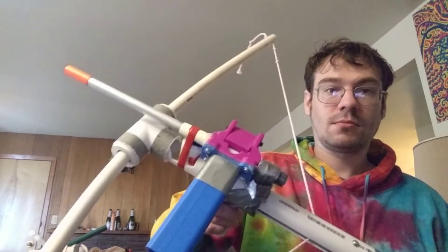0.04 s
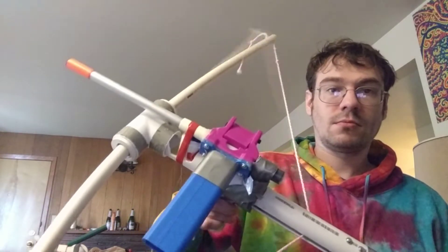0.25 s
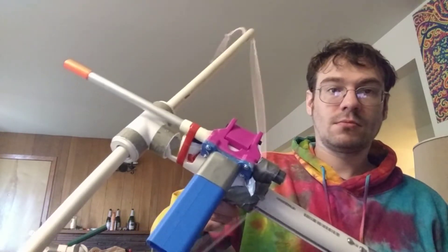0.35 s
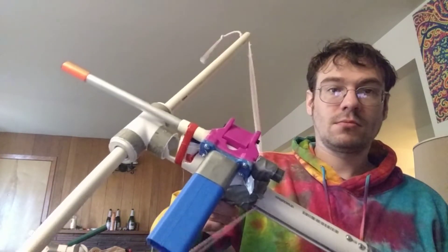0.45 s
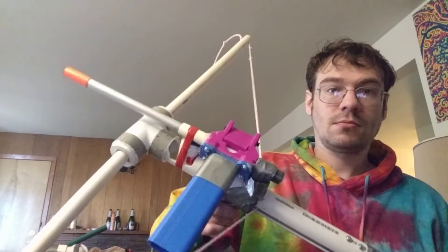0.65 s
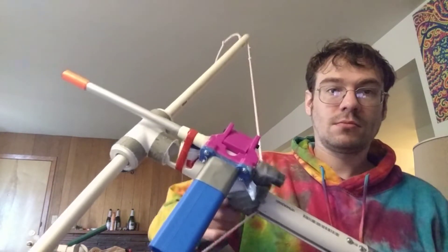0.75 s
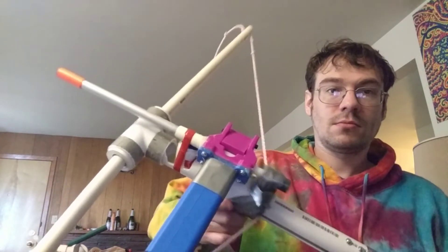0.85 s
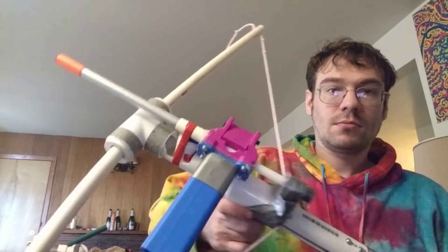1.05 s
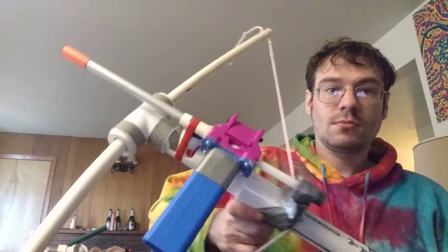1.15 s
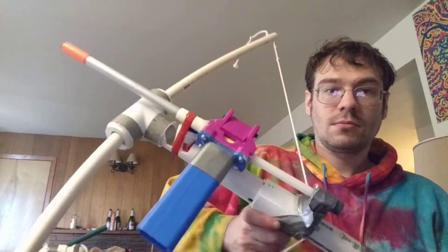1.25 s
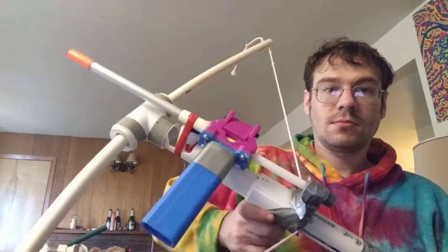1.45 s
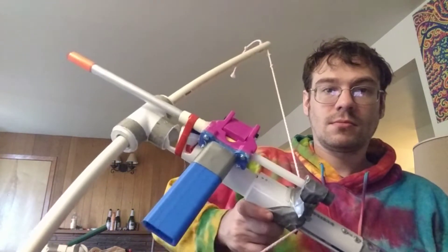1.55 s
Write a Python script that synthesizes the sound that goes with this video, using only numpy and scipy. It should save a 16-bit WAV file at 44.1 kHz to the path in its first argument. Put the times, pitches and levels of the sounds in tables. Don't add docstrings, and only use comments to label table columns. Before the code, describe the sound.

Close to a small laptop microphone, a plastic and pipe dart blaster slams and rebounds, goes nearly quiet with light handling, then its slide scrapes, latches and thuds shut over soft room hum.

```python
import sys
import numpy as np
from scipy import signal
from scipy.io import wavfile
from scipy.ndimage import uniform_filter1d

SR = 44100
rng = np.random.default_rng(int(sys.argv[2]) if len(sys.argv) > 2 else 0)


def volts_from_decibels(level):
    exponent = np.asarray(level, float) / 20
    return 10 ** exponent


def master_out(mix):
    frames = np.transpose(np.atleast_2d(mix))
    ceiling = np.clip(frames, -1, 1)
    pcm = np.round(ceiling * 32767).astype(np.int16)
    wavfile.write(sys.argv[1], SR, pcm)


N = 70560

# frequency [Hz], level [dB].
HUM_COLOUR = [(20, -31.5), (60, -15.5), (250, -9.5), (800, -5), (1840, -14.5), (4500, -34.5),
              (11000, -40.5), (13000, -30), (16000, -39.5)]
# centre [Hz], width [Hz], level [dB].
DRONES = [
    (79.2, 7.1, -67.5),
    (145.5, 16, -70.5),
    (249.8, 2.7, -66.5),
]
# frequency [Hz], time to fall 60 dB [s].
ROOM_T60 = [(150, 0.33), (500, 0.37), (1500, 0.33), (4000, 0.34), (9000, 0.2), (15000, 0.24)]
# start [s], frequency [Hz], width [Hz], level [dB].
JOLTS = [
    (.236, 78, 30, -29.5),
    (.255, 59, 10, -36.5),
    (.34, 63.4, 23, -46),
    (1.185, 62, 16, -45),
]
# time [s], effort [dB].
RUB_EFFORT = [(.1, -74), (.6, -66.5), (.7, -66), (.8, -60), (0.881, -57.5), (.92, -68.5), (1.0, -61),
              (1.09, -67.5), (1.137, -62), (1.142, -59), (1.172, -50.5), (1.3, -53.5), (1.38, -61.5),
              (1.45, -70)]
# frequency [Hz], level [dB].
RUB_COLOUR = [(290, -46), (500, -4.5), (1360, -3.5), (1460, -12), (16000, -36.5)]
# start [s], frequency [Hz], width [Hz], level [dB].
THUMPS = [(0.2529, 216, 57, -6.5), (.257, 162, 37, -13), (.342, 242, 44, -15), (.3575, 488, 41.5, -14),
          (0.361, 355.4, 13, -24), (.822, 2690, 38, -51), (.845, 1340, 23, -54), (.372, 409, 73, -9.5),
          (.397, 390, 91, -25), (1.2063, 276.6, 69, -15.5), (1.382, 236, 44, -17.5)]

# start [s], body [dB], crack [dB], contact [ms].
RELEASE = [
    (0.2331, -19.5, -37, 0.41),
    (0.2359, -17.5, -32, 0.18),
    (0.2395, -14.5, -29, 0.15),
    (0.2408, -18.5, -37.5, 0.2),
    (.2445, -44, -25.5, .4),
]
# start [s], body [dB], crack [dB], contact [ms].
SLAM = [
    (.2543, -8, -10, .15),
    (.2562, -17, -27, 0.45),
    (.2583, -21.5, -23.5, 0.41),
    (0.2615, -11, -18.5, .3),
    (.2645, -22.5, -20.5, .5),
    (.268, -15.5, -37, 0.29),
    (0.2743, -17.5, -38, 0.34),
]
# start [s], body [dB], crack [dB], contact [ms].
REBOUND = [(0.3406, -5, -18.5, 0.472), (.346, -25, -25.5, .4), (0.349, -9.5, -20.5, 0.497),
           (.3545, -34, -31, .3), (.3575, -14.5, -28, 0.4), (.3605, -22, -30.5, .4),
           (.3638, -9.5, -22.5, 0.6), (.369, -17.5, -25, 0.36), (0.3748, -13, -26, 0.568),
           (.382, -17.5, -29, 0.33), (.392, -16.5, -36, 0.36), (.404, -22, -44, 0.45),
           (.4095, -23, -40, 0.43)]
# start [s], body [dB], crack [dB], contact [ms].
GRIP = [
    (0.6664, -57, -48, 0.18),
    (0.6682, -46, -41, 0.11),
    (0.6731, -38, -36, 0.1),
    (.679, -31.5, -38.5, 0.41),
    (.6858, -33.5, -43, 0.18),
    (0.6948, -41, -41, .15),
    (0.72, -43, -57, 0.28),
    (.779, -58, -60, 0.17),
    (0.825, -47.5, -59.5, 0.086),
]
# start [s], body [dB], crack [dB], contact [ms].
CATCH = [(.001, -41.5, -56.5, 0.12), (0.1713, -43, -55.5, 0.1), (0.222, -41, -62, 0.46),
         (1.1409, -42, -60, 0.25), (1.151, -41, -60.5, 0.48), (1.159, -47, -57, 0.14),
         (1.169, -47, -54, 0.12), (1.175, -36, -40, 0.485), (1.182, -21, -29.5, 0.18),
         (1.2217, -24, -33.5, 0.27), (1.3665, -50, -50, 0.41)]
# start [s], body [dB], crack [dB], contact [ms].
LATCH = [
    (1.1753, -48, -42.5, 0.034),
    (1.196, -18, -25.5, 0.022),
    (1.1977, -16.5, -25.5, 0.089),
    (1.2, -20, -26, 0.2),
    (1.2045, -20.5, -34, 0.033),
    (1.2085, -22.5, -32.5, .2),
    (1.2125, -43, -36, 0.11),
    (1.2305, -35, -36, 0.0646),
]
# start [s], body [dB], crack [dB], contact [ms].
SHUT = [
    (1.3815, -48, -44, .1),
    (1.3829, -18, -33, 0.3),
    (1.3901, -18, -38, .35),
]

# frequency [Hz], width [Hz], level [dB].
RELEASE_MODES = [(607, 110, -0.5), (784, 190, -1.5), (1650, 116, 5.5), (2690, 51, -9), (7450, 400, -3)]
SLAM_MODES = [(465, 30, -11), (607, 77, -4), (673, 21, 0), (821, 30, 4), (1010, 80, -8), (1109.6, 34, 1.5),
              (1201, 53, -2.5), (1700, 39, -10)]
REBOUND_MODES = [(435, 105, -7), (887, 310, 7), (1290, 82, -6), (1435, 60, -12), (1800, 55, -27),
                 (2050, 76, -19), (2870, 170, -4)]
GRIP_MODES = [(816, 52, 6), (1000, 79, -5), (1080, 36, 1), (2030, 71, -10), (2880, 100, 5),
              (3500, 250, -13), (4430, 175, -5)]
CATCH_MODES = [(702, 17, -5.5), (862, 56, -5.5), (1343, 140, -4.5), (1666, 180, -3.5), (2070, 250, -14.5),
               (2550, 120, -12.5), (5300, 280, -25)]
LATCH_MODES = [(705, 45, -5), (1000, 70, -8), (1400, 60, -3), (2780, 50, -8), (3520, 130, 1),
               (4040, 170, -2), (4850, 110, -5), (5490, 45, -6), (6900, 60, -9), (7800, 400, -2)]
SHUT_MODES = [(556, 19, -9), (343, 30, -10), (708, 21, -5), (476, 20, -7), (824, 30, 1), (1370, 35, -17),
              (970, 24, -8), (1680, 35, -14), (1108, 27, -2.5), (1990, 35, -18), (1865, 45, -11),
              (640, 40, -11)]

# frequency [Hz], level [dB].
RELEASE_CRACK = [(180, -23), (300, 1.5), (1640, -8.5), (7440, -15), (16000, -40.5)]
SLAM_CRACK = [(180, -57.5), (300, -13), (1230, -4.5), (1900, -13), (6960, -27.5), (12000, -34),
              (15000, -39), (16000, -49)]
REBOUND_CRACK = [(250, -11.5), (500, -2), (1300, -8.5), (2500, -18.5), (5500, -32), (12000, -38),
                 (16000, -43.5)]
GRIP_CRACK = [(180, -54), (400, -6.5), (900, -1.5), (1500, -11.5), (2900, -13), (5000, -16), (16000, -28.5)]
CATCH_CRACK = [(240, -30), (400, 6), (1490, 0.5), (14400, -36.5), (16000, -87)]
LATCH_CRACK = [(180, -37), (300, -9), (392, -15), (842, -5), (2840, -9.5), (16000, -28)]
SHUT_CRACK = [(250, -33), (600, -3.5), (1100, -13.5), (1900, -16), (2600, -29), (7000, -36.5),
              (16000, -48.5)]

# crack fall by 60 dB [s], rattle level [dB], rattle fall by 60 dB [s], room level [dB].
AFTER = [
    (0.018, -8.5, 0.19, -21),
    (0.015, -16.5, 0.33, -9),
    (0.014, -13.5, 0.37, -8.5),
    (0.016, -5, 0.21, -16),
    (0.0033, -4, 0.14, -8),
    (0.018, -13, 0.22, -13.5),
    (0.034, -4, 0.13, -13),
]

HUM_DB = -60.5
RUB_PER_S, RUB_SPREAD_DB = 9000, 1.5
SPOT_DB, LOOSE_DB = 2, 1.8
THUMP_RISE_S = 0.0025
WHIP_S, WHIP_LENGTH_S, WHIP_DB = 0.2452, 0.0092, -13.5
WHIP_LOW_HZ, WHIP_HIGH_HZ = 780, 6000
MIC_LOW_HZ, TOP_HZ = 111, 15700


def evened(x):
    return x / np.sqrt(np.mean(x ** 2) + 1e-20)


def read(points, hz):
    f, value = np.transpose(points)
    return np.interp(np.log(hz + 1), np.log(f + 1), value)


def add(mix, s, sound):
    part = mix[round(s * SR):][:len(sound)]
    part += sound[:len(part)]


def coloured(x, points, tilt_db=0.):
    hz = np.fft.rfftfreq(4096, 1 / SR)
    log_gain = np.log(volts_from_decibels(read(points, hz) + tilt_db * np.log2(hz / 1000 + 0.059)))
    full = np.r_[log_gain, log_gain[-2:0:-1]]
    taps = np.fft.ifft(np.exp(np.conj(signal.hilbert(full)))).real[:2048]
    return signal.oaconvolve(x, taps / np.linalg.norm(taps))[:len(x)]


def hum():
    frames, hz = N // 512 + 5, np.fft.rfftfreq(2048, 1 / SR)
    a, b, patches = rng.standard_normal((frames, 1025, 3)).T
    patches = uniform_filter1d(patches, size=20, axis=0)
    patches = evened(uniform_filter1d(patches, size=8, axis=1))

    def noise(gain):
        return evened(signal.istft((a + 1j * b) * gain, nperseg=2048, noverlap=1536)[1][:N])

    out = volts_from_decibels(HUM_DB) * noise(volts_from_decibels(read(HUM_COLOUR, hz)[:, None] + 4.7 * patches))
    for centre, width, db in DRONES:
        out += volts_from_decibels(db) * noise(np.exp(-0.5 * ((hz[:, None] - centre) / width) ** 2))
    return out


def room(x):
    taps = np.zeros(SR)
    at = np.arange(160, SR - 20, 20)
    taps[at + rng.integers(0, 20, len(at))] = rng.choice([-1., 1.], len(at))
    hz, t, z = signal.stft(taps, SR, nperseg=256)
    fall = volts_from_decibels(-60 * t / read(ROOM_T60, hz)[:, None])
    tail = signal.istft(z * fall, SR, nperseg=256)[1]
    return signal.fftconvolve(x, tail / np.linalg.norm(tail))[:N]


def rubbing():
    slips = (rng.random(N) < RUB_PER_S / SR) * rng.standard_normal(N)
    slips = slips * volts_from_decibels(RUB_SPREAD_DB * rng.exponential(1, N))
    s, db = np.transpose(RUB_EFFORT)
    effort = volts_from_decibels(np.interp(np.arange(N) / SR, s, db))
    return effort * evened(coloured(slips, RUB_COLOUR, tilt_db=2.5))


def thumps(rows):
    t, out = np.arange(SR // 4) / SR, np.zeros(N)
    for s, hz, width, db in rows:
        swell = (1 - np.exp(-t / THUMP_RISE_S)) ** 2
        add(out, s, volts_from_decibels(db) * swell * np.exp(-np.pi * width * t) * np.sin(2 * np.pi * hz * t))
    return out


def whip():
    out = np.zeros(N)
    u = np.arange(0, 1, 1 / (WHIP_LENGTH_S * SR))
    hz = WHIP_LOW_HZ + (WHIP_HIGH_HZ - WHIP_LOW_HZ) * u ** 5
    swell = np.sin(np.pi * u ** 1.9) ** 0.5 * (WHIP_LOW_HZ / hz) ** 0.6
    add(out, WHIP_S, volts_from_decibels(WHIP_DB) * swell * np.sin(2 * np.pi * np.cumsum(hz) / SR))
    return out


def ringing(modes, t):
    spots = volts_from_decibels(SPOT_DB * rng.standard_normal(len(modes))) * (-1) ** np.arange(len(modes))
    out = np.zeros(len(t))
    for spot, (hz, width, db) in zip(spots, modes):
        strength = spot * np.sqrt(width) * volts_from_decibels(db)
        out += strength * np.exp(-np.pi * width * t) * np.sin(2 * np.pi * hz * t)
    return out / abs(out).max()


def part(knocks, modes, crack, after):
    crack_s, rattle_db, rattle_s, room_db = after
    t = np.arange(SR // 2) / SR
    body, snap = np.zeros(N), np.zeros(N)
    for s, body_db, crack_db, ms in knocks:
        push = np.exp(-0.5 * ((t[:400] * 1000 - 1.2 * ms) / (0.3 * ms)) ** 2)
        add(body, s, volts_from_decibels(body_db) * signal.oaconvolve(ringing(modes, t), push / push.sum()))
        unevenness = volts_from_decibels(LOOSE_DB * rng.exponential(1, len(t)))
        loose = evened(rng.standard_normal(len(t)) * unevenness)
        rattle = volts_from_decibels(rattle_db - 60 * t / rattle_s) * (1 - np.exp(-t / 0.00076))
        shape = volts_from_decibels(-60 * t / crack_s) + rattle
        add(snap, s + 2 * ms / 1000, volts_from_decibels(crack_db) * loose * shape)
    dry = body + coloured(snap, crack, tilt_db=1.5)
    return np.array([dry, volts_from_decibels(room_db) * dry])


def scene():
    parts = zip([RELEASE, SLAM, REBOUND, GRIP, CATCH, LATCH, SHUT],
                [RELEASE_MODES, SLAM_MODES, REBOUND_MODES, GRIP_MODES, CATCH_MODES, LATCH_MODES, SHUT_MODES],
                [RELEASE_CRACK, SLAM_CRACK, REBOUND_CRACK, GRIP_CRACK, CATCH_CRACK, LATCH_CRACK, SHUT_CRACK],
                AFTER)
    blaster = sum(part(*p) for p in parts)
    blaster = blaster + whip() * volts_from_decibels([[0], [-8]]) + thumps(THUMPS) * volts_from_decibels([[0], [-7]])
    dry, wet = blaster
    mic = signal.butter(2, MIC_LOW_HZ, "high", fs=SR, output="sos")
    near = signal.sosfilt(mic, dry + room(wet))
    return (near + thumps(JOLTS) + rubbing() + hum())[None]


def roll_off(x):
    return signal.sosfilt(signal.butter(12, 16790, fs=SR, output="sos"), x)


def record(dry):
    band = signal.butter(14, TOP_HZ, fs=SR, output="sos")
    return roll_off(signal.sosfilt(band, dry))


dry = scene()
out = record(dry)
master_out(out)
```